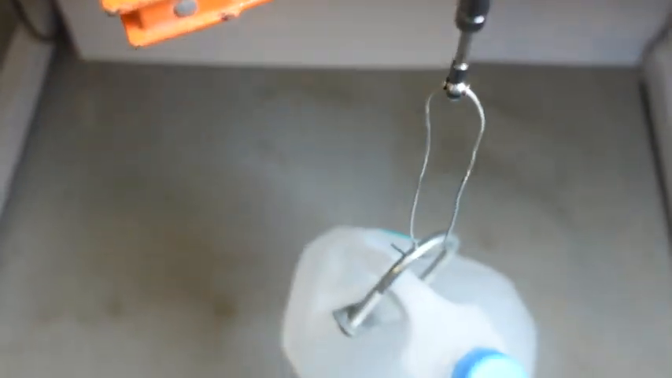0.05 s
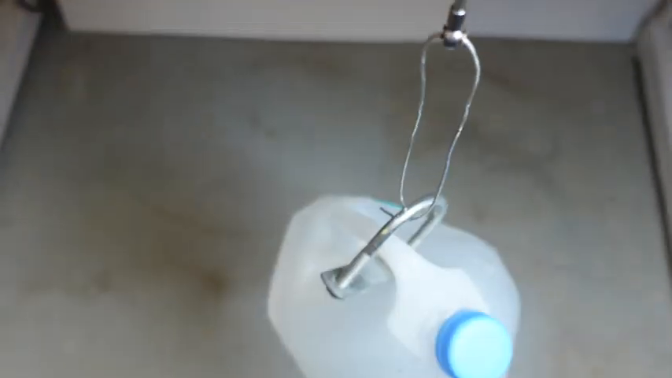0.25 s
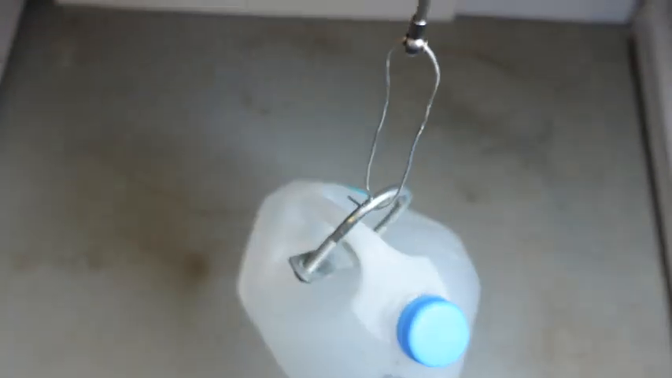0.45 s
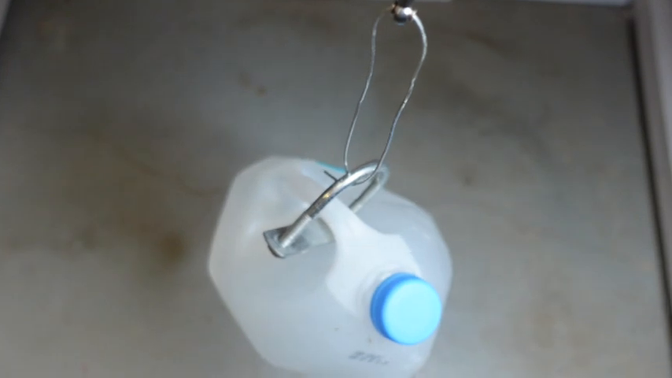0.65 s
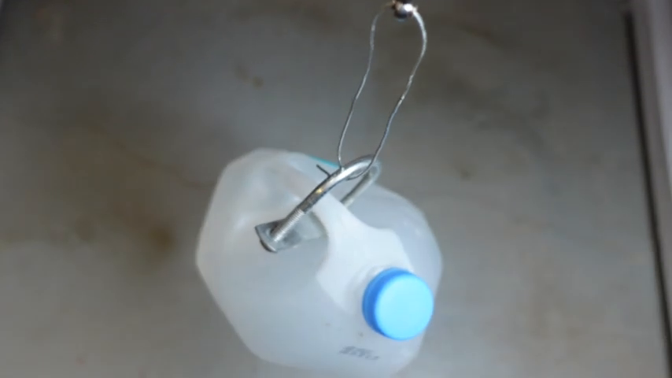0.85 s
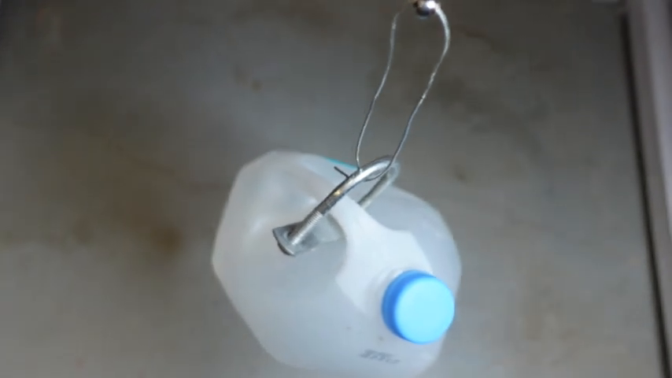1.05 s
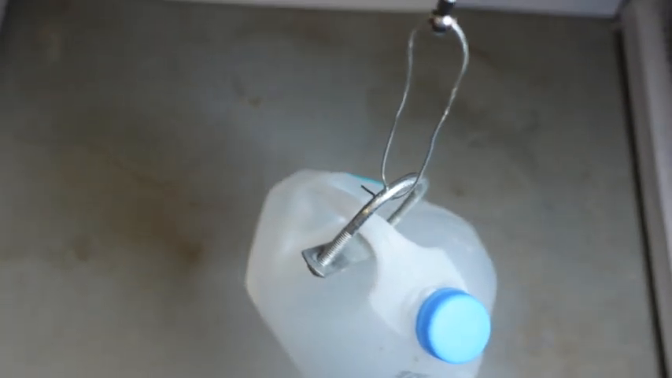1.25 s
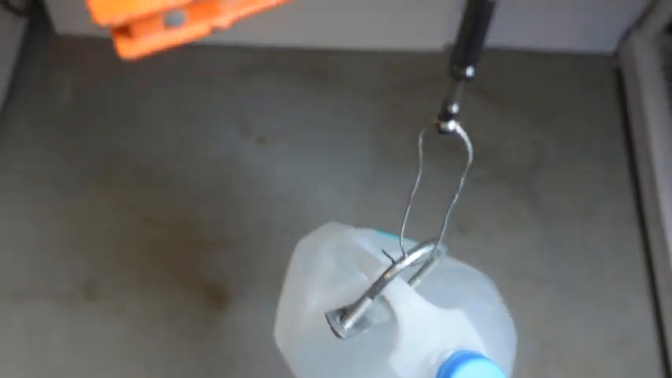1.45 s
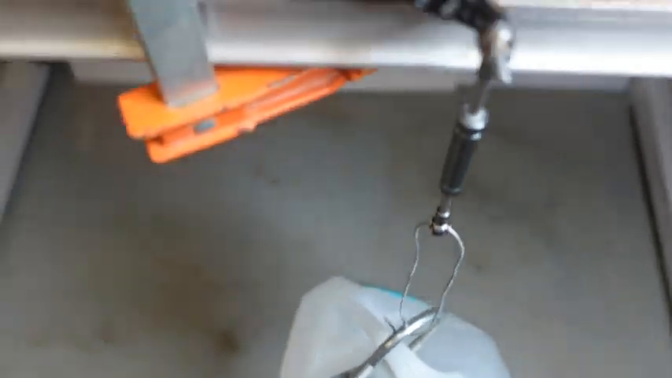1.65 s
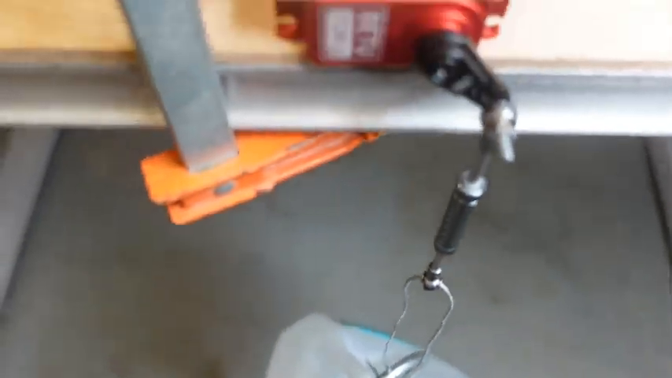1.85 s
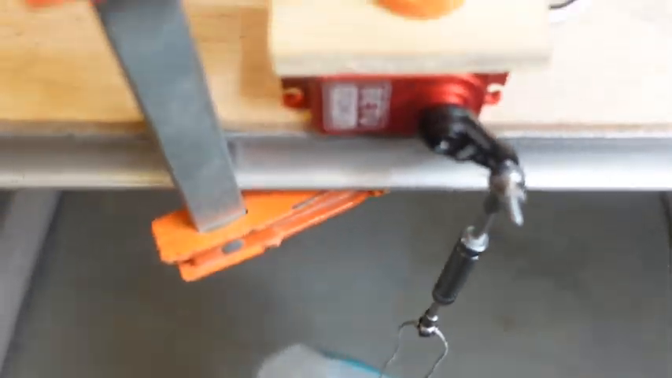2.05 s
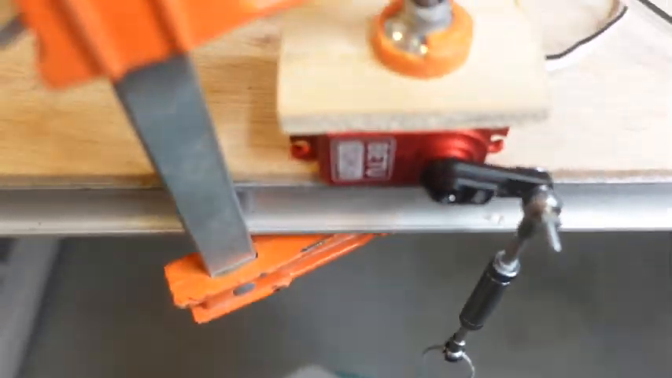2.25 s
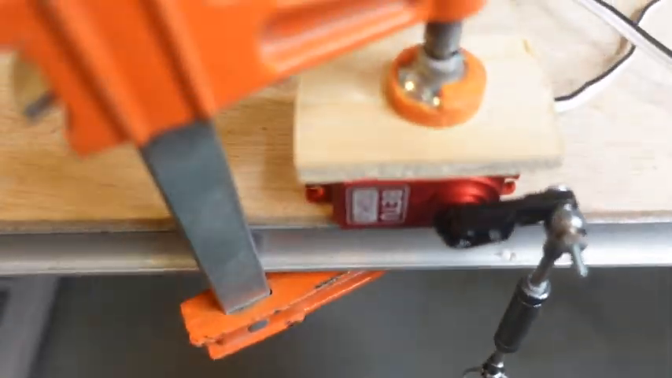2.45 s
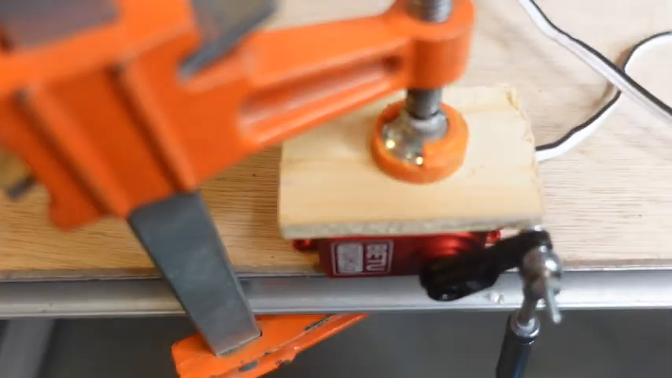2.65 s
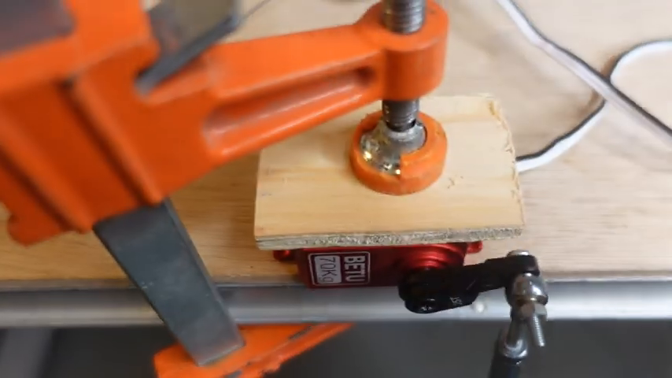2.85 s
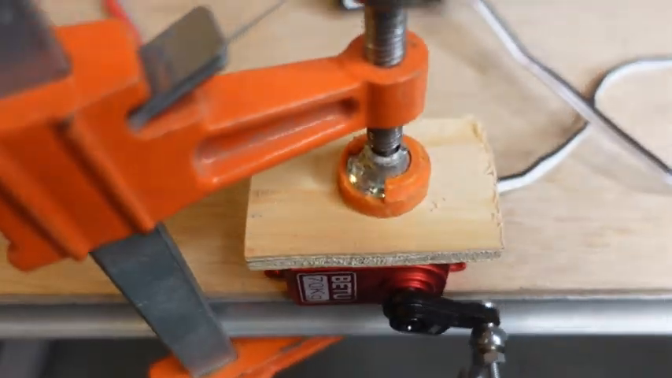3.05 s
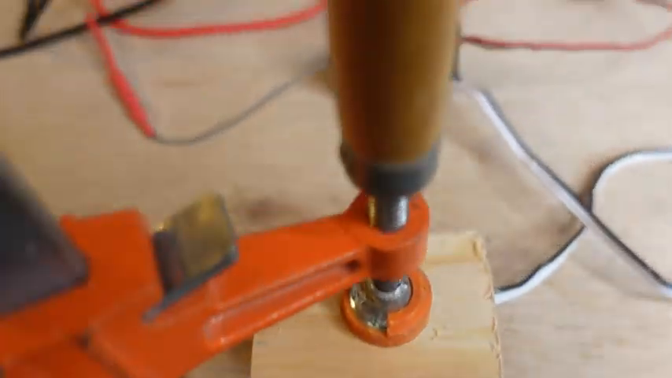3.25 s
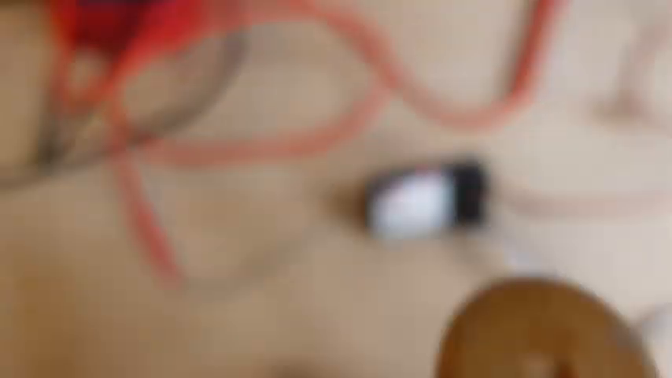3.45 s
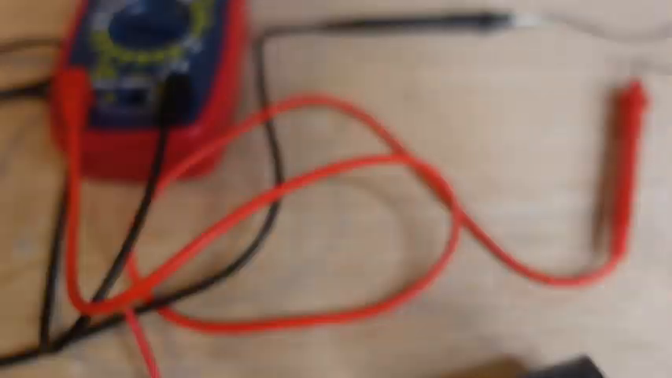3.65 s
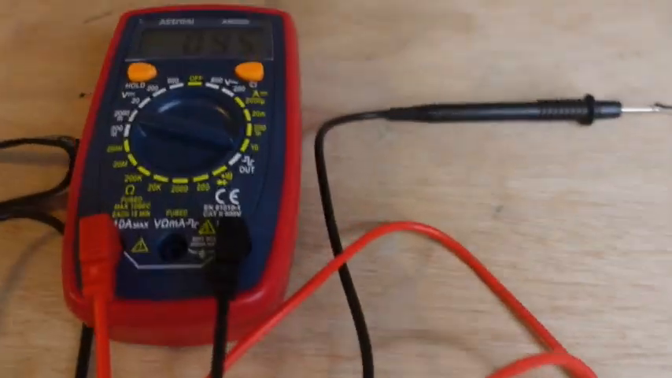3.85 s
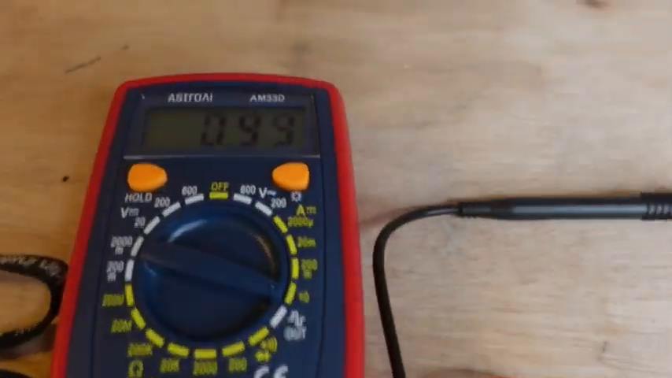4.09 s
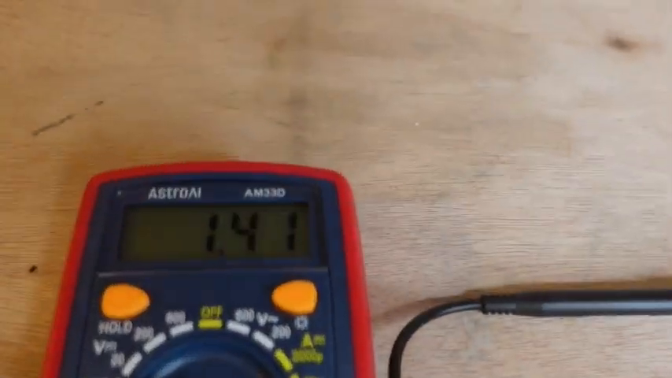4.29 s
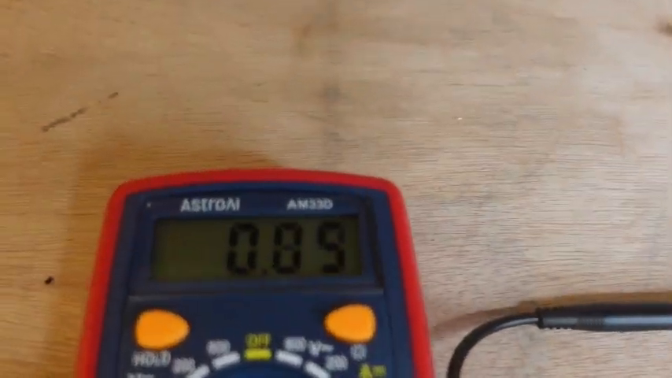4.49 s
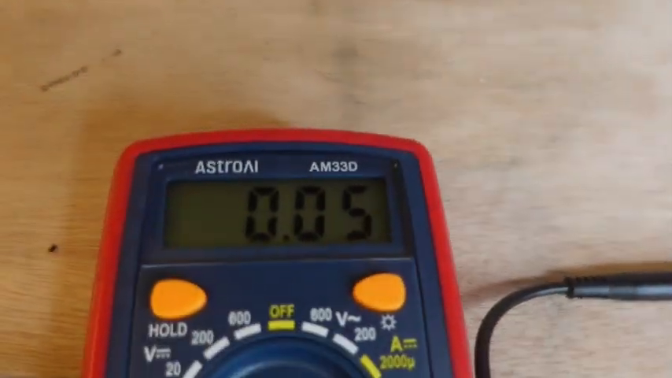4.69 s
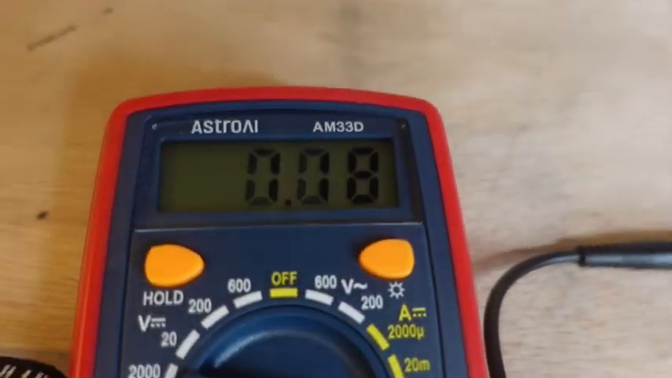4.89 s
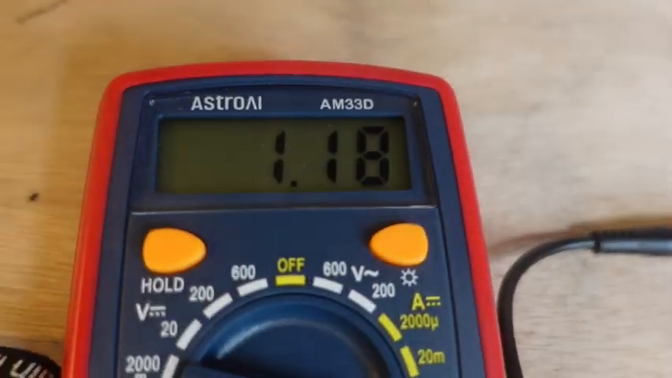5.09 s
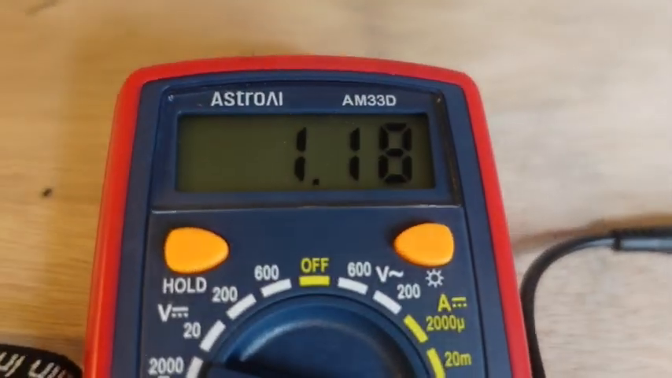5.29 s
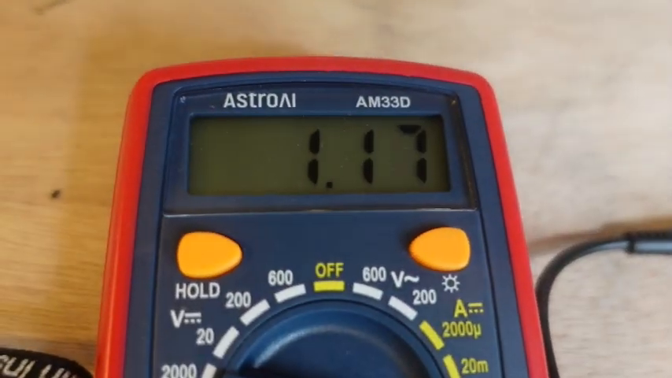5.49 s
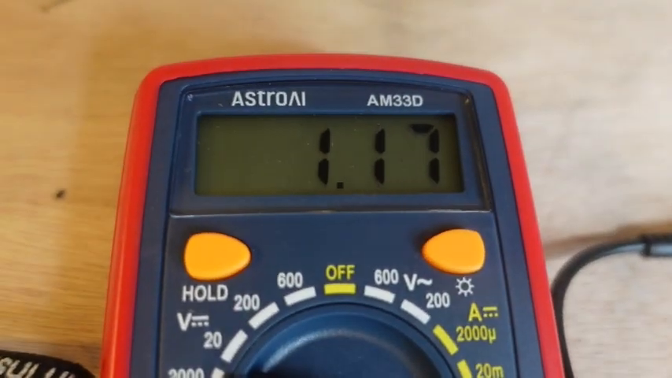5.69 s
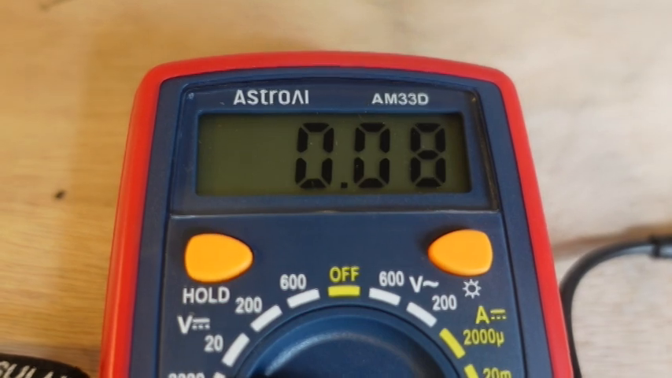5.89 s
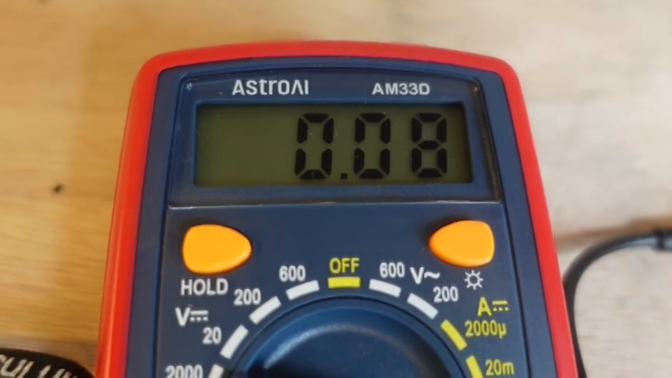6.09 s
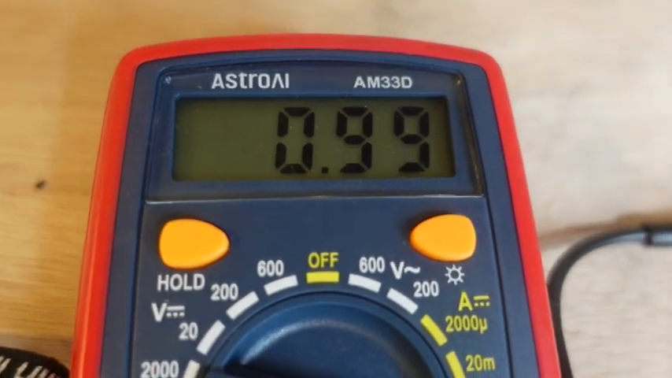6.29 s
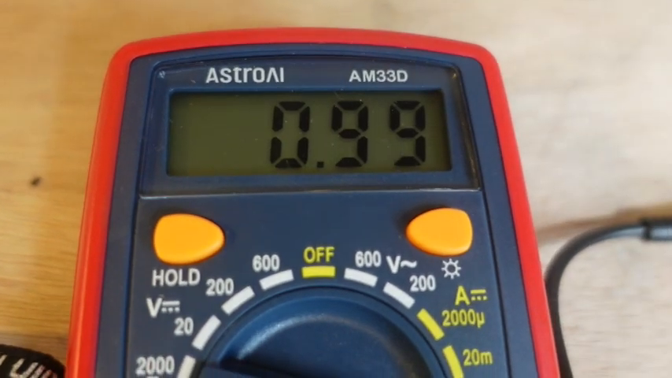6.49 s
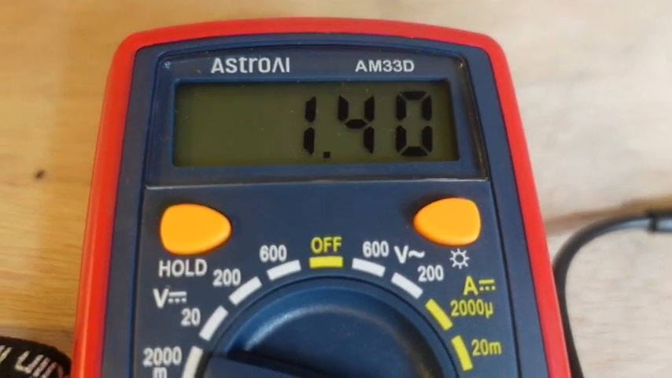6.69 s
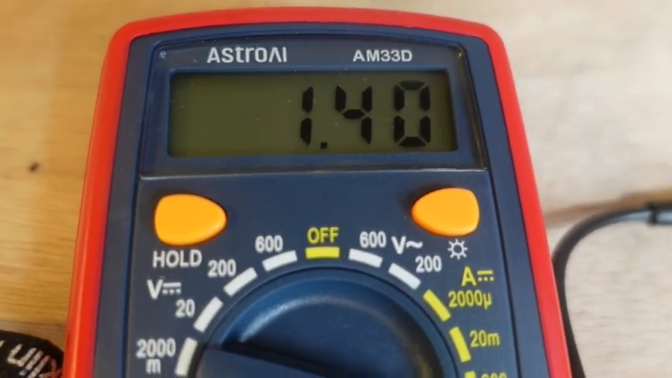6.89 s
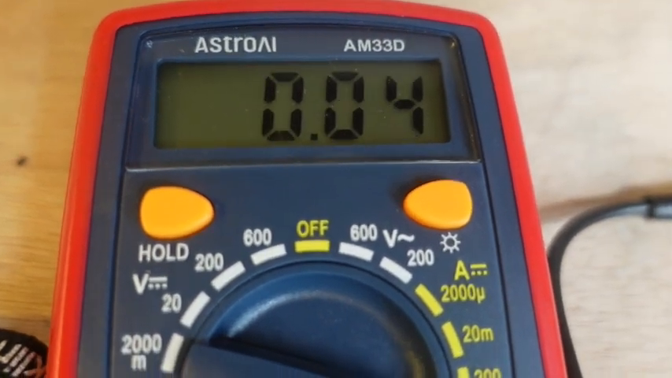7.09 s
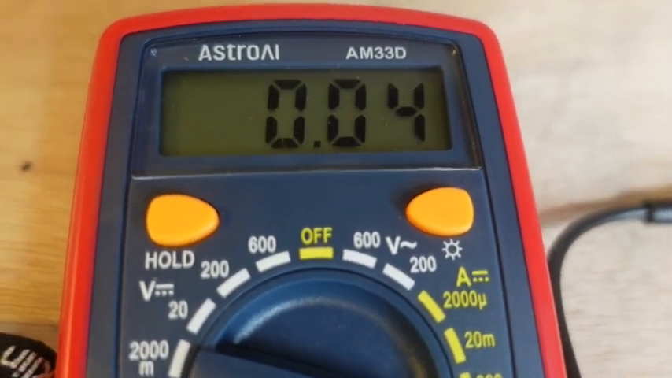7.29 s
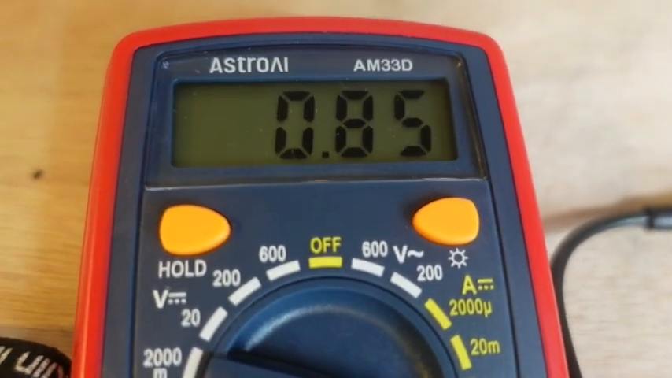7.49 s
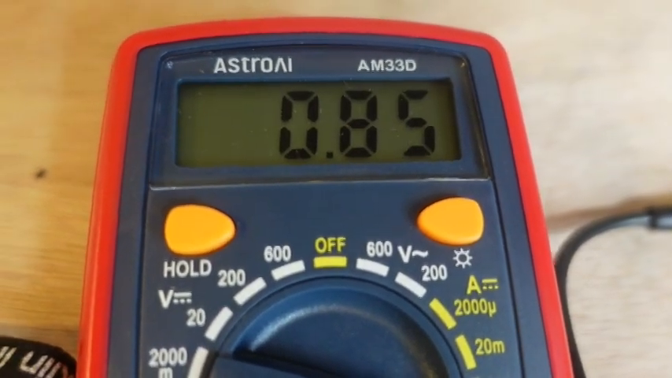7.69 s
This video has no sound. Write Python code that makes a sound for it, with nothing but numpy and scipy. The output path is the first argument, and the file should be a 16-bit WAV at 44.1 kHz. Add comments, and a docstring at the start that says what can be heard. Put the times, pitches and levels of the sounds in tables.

```python
"""In a quiet workshop, a small servo motor clamped to a bench lifts and lowers a hanging water jug.
It makes twelve quick sweeps: slow and labouring on the way up, fast and surging on the way down.
Its smallest gear whines and its metal teeth rattle, shaking the case and the bench top, while the
motor's drive adds a thin whistle. The microphone starts in front of the servo and moves off over
the bench, with a soft rustle and a few bumps from the hand."""
import sys
import numpy as np
from scipy import signal
from scipy.fft import rfft, irfft
from scipy.io import wavfile
from scipy.ndimage import uniform_filter1d, map_coordinates

SR = 44100
rng = np.random.default_rng(int(sys.argv[2]) if len(sys.argv) > 2 else 0)


def pcm_store(signal):
    """Save signal as 16-bit PCM."""
    levels = np.round(np.clip(np.atleast_2d(signal), -1, 1) * 32767)
    wavfile.write(sys.argv[1], SR, levels.astype(np.int16).T)


N = 341368
TIME = np.arange(N) / SR

# Levels in the tables are relative: the functions set how loud each sound ends up.
# The tone of the workshop's background hush. Each row: frequency in Hz, level in dB.
AIR_TONE = [(15, -76), (25, -24), (71, -4.5), (172, -2.5), (363, -6.5), (790, -8), (3090, -18), (4870, -30),
            (5720, -20), (13100, -32.5), (15000, -12)]
# Sweeps that lift the jug, then those that lower it. Only the tail of the first lift is heard.
# Each row: start in seconds, length in seconds, speed in teeth per second, then five levels in dB:
# effort (how hard the gears push), whine, treble, bench and whistle.
LIFT_SWEEPS = [ (-.6, 0.57, 1610, -21, 2, -0.5, 10, 3), (.812, 0.5, 1623, -14, 0.5, -1.5, -6.5, -1),
               (2.009, 0.55, 1621, -15.5, 3, -1.5, -7.5, -6.5), (3.432, 0.53, 1614, -19, 1, -0.5, 2.5, -12),
               (4.657, .518, 1629, -21, 1.5, 2, 6, -14), (5.982, 0.54, 1601, -21.5, 1, 2.5, 7, -11.5),
               (7.264, 0.54, 1612, -21.5, 2, 3, 7, -13)]
LOWER_SWEEPS = [ (.15, 0.32, 2191, -16.5, 6, 4.5, 0.5, 3.5), (1.351, .33, 1893, -12.5, -3, -1.5, -1, -1.5),
                (2.782, .37, 2127, -14, 0.5, 0.5, -2.5, 0), (4.117, 0.32, 2196, -22.5, 3, 5, 13.5, -4),
                (5.32, .41, 1649, -19.5, -5, -0.5, 9.5, 1), (6.66, 0.32, 2259, -20, 1, 3.5, 12, -5)]
# The swinging jug lets the motor run ahead until its controller reins it in.
# Each row: peak time in seconds, extra speed in teeth per second, build-up in seconds.
JUG_SURGES = [ (0.249, 1337, 0.035), (.385, 699.6, 0.056), (0.919, 210.3, 0.031), (1.425, 804.6, 0.041),
              (1.555, 539.3, 0.058), (2.188, 89.7, .03), (2.897, 1085, 0.038), (3.125, 446.3, 0.039),
              (3.621, 69.92, 0.041), (4.22, 1207, .05), (4.389, 829, .035), (4.78, 140.4, .03),
              (5.41, 764.4, .04), (5.63, 855.6, 0.037), (5.71, 550, .02), (6.095, 189.8, .03),
              (6.755, 1147, .045), (6.89, 599.2, 0.048)]
# The tones in the whine. Each row: multiple of the tooth rate, level in dB, dB added as speed doubles.
WHINE_TONES = [(1, -9, 0), (2, -18, 12), (3, -12, -2)]
# The tone of the case, heard from the front and from aside. Each row: frequency in Hz, level in dB.
CASE_FRONT_TONE = [(700, -84.5), (1200, -38.5), (1700, -28.5), (2300, -19.5), (3050, -17), (3560, -5),
                   (4790, -2.5), (5550, -8.5), (8130, -12), (8940, -15.5), (10400, -13), (11300, -21.5),
                   (14100, -25.5), (15200, -55)]
CASE_ASIDE_TONE = [(700, -46.5), (1200, -69.5), (1700, -16), (2700, -21), (3140, -9), (3450, 1), (4090, -4),
                   (4790, 3.5), (5320, -0.5), (7160, -16), (9320, -10.5), (11000, -17), (14400, -21),
                   (15200, -28)]
# The overall tone of the bench top. Each row: frequency in Hz, level in dB.
BENCH_TONE = [(40, -26), (100, -8.5), (200, 1), (450, -6.5), (700, -10), (1150, -6), (1700, -1.5),
              (2600, -0.5), (4000, -38)]
# Pitches at which the case and the bench ring. Each row: frequency in Hz, width in Hz, boost in dB.
CASE_RINGS = [(1605, 120, 10), (2360, 89, 2), (2840, 12, 11.5), (3587, 68, 11.5), (3877, 133, 10.5),
              (4240, 97, 8), (4573, 38, -7), (4730, 46, 9), (4990, 233, 6.5), (5430, 24, 7.5),
              (6260, 39, 5.5), (6172, 47, 5), (6623, 130, 9.5), (7320, 440, 7), (7930, 75, 12.5),
              (8900, 67, 8), (12600, 330, 3.5)]
BENCH_RINGS = [(138, 9.6, 13), (224, 22, 6), (412.3, 28, 10.5), (552, 72, 7.5), (793, 26, 13),
               (923.3, 70, 17)]
# The tone of the echoes from the sides. Each row: frequency in Hz, level in dB.
SIDE_TONE = [(150, 1), (700, 5.5), (2000, 2.0), (5000, 3.0), (12000, -1)]
# The gears tick as they take up their slack. Each row: start in seconds, level in dB.
SLACK_TICKS = [(.109, -14), (.786, -34), (.807, -48), (1.944, -27), (2.755, -18), (4.122, -22),
               (4.627, -30), (7.233, -32), (7.275, -37)]
# The teeth lock in and squeal. Each row: peak time in seconds, half length in seconds, level in dB.
GEAR_SQUEALS = [(0.224, 0.0093, -15), (2.889, 0.02, -3.5), (4.216, .011, -1), (4.385, 0.027, -10),
                (6.766, 0.015, -2.5)]
# The hand bumps the microphone. Each row: start in seconds, level in dB.
HAND_BUMPS = [(2.369, -53), (4.079, -35.5), (5.199, -26), (6.462, -21), (6.529, -30), (6.649, -31.5),
              (7.53, -26), (7.569, -32), (7.639, -27.5)]
# The dull tone of a bump. Each row: frequency in Hz, level in dB.
BUMP_TONE = [(40, -12), (90, -1), (150, 12.5), (220, 8.5), (320, -3.5), (900, -13), (3000, -83)]
# The rise and fall of the carried microphone's rustle. Each row: time in seconds, level in dB.
RUSTLE_LEVELS = [(3.335, -83), (3.345, -47.5), (3.42, -44.5), (3.55, -65)]
# The tone of that rustle. Each row: frequency in Hz, level in dB.
RUSTLE_TONE = [(200, -29), (1000, -14.5), (1600, 0.5), (2800, -0.5), (6000, -1.5), (14000, -14.5)]

TEETH = 10  # on the pinion, the small gear on the motor's shaft


def undb(db):
    """Turn decibels into a number to multiply by."""
    return 10 ** (np.asarray(db) / 20)


def unit(x):
    """Scale a signal so that its average strength (rms) is 1."""
    return x / np.sqrt(np.mean(x ** 2))


def wobble(rate):
    """A random wobble of strength 1 that changes course about rate times a second."""
    knots = rng.standard_normal(N // 8)
    return unit(np.interp(TIME * rate, np.arange(len(knots)), knots))


def body(tone, rings=(), size=4096):
    """How an object answers one sharp tap, given its overall tone and the pitches it rings at."""
    f = np.maximum(np.arange(size // 2 + 1) * SR / size, 1)
    hz, db = np.transpose(tone)
    db = np.interp(np.log(f), np.log(hz), db)
    for centre, width, peak_db in rings:
        db = db + peak_db / (1 + (2 * (f - centre) / width) ** 2)
    # make all the ringing come after the tap, never before it
    cepstrum = irfft(np.log(undb(db)))
    cepstrum[1:size // 2] *= 2
    cepstrum[size // 2 + 1:] = 0
    response = irfft(np.exp(rfft(cepstrum)))
    return response / np.linalg.norm(response)


def ring(x, response):
    """Treat every sample of x as a tap that sets off the response."""
    return signal.fftconvolve(x, response)[:N]


def clicks(times, sizes):
    """One sharp click at each time."""
    return np.bincount(np.clip(times * SR, 0, N - 1).astype(int), sizes, N)


def bursts(events, decay_s):
    """A short burst of noise that dies away, for each row of start time and level."""
    times, db = np.transpose(events)
    fade = np.exp(-TIME[:SR // 2] / decay_s)
    return ring(clicks(times, undb(db)), fade) * rng.standard_normal(N)


def workshop_air(level_db=-53):
    """The room's faint hush, gently rising and falling."""
    return undb(level_db + wobble(1.7)) * ring(rng.standard_normal(N), body(AIR_TONE))


def latest_sweep():
    """For every sample: whether the latest sweep is a lift, and the values in its row."""
    rows = [(*row, True) for row in LIFT_SWEEPS] + [(*row, False) for row in LOWER_SWEEPS]
    rows = np.array(sorted(rows))
    latest = np.maximum(np.searchsorted(rows[:, 0], TIME) - 1, 0)
    *columns, lifting = rows[latest].T
    return lifting > 0, columns


def jug_load(lifting, age, arm_level_s=.36, width_s=.07):
    """The jug's extra pull during a lift, from 0 to 1, greatest when the arm is level."""
    return lifting * np.exp(-.5 * ((age - arm_level_s) / width_s) ** 2)


def motor_speed(lifting, age, length, run_hz, crawl_hz=399.5, brake_early_s=.05, brake_s=.16):
    """Teeth meeting per second: the motor speeds up, sags under load, surges and brakes to a crawl."""
    hz = run_hz * (1 - .1 * jug_load(lifting, age))
    for at, extra_hz, build_s in JUG_SURGES:
        width_s = np.where(TIME < at, build_s, .55 * build_s)  # a surge dies faster than it builds
        hz = hz + extra_hz * np.exp(-.5 * ((TIME - at) / width_s) ** 2)
    spin_up = 1 - np.exp(-age / np.where(lifting, .028, .019))
    brake = np.exp(-(np.maximum(age - length + brake_early_s, 0) / brake_s) ** 2)
    hz = uniform_filter1d(crawl_hz + (hz - crawl_hz) * spin_up * brake, size=200)
    return hz * (1 + .019 * wobble(55))  # the controller hunts for the right speed


def motor_effort(lifting, age, length, effort_db, shudder_db=1.17):
    """How hard the gears are pushed: the push builds, holds, then fades to a faint holding buzz."""
    attack_db = -32.5 * np.exp(-age / np.where(lifting, .03, .012))
    release_db = -np.maximum(age - length, 0) * np.where(lifting, 189.5, 296)
    # the drive cuts out just before it turns round to lower
    cut_db = sum(np.interp(TIME, [start - .03, start], [0, -79], right=0) for start, *_ in LOWER_SWEEPS)
    rest_db = np.where(lifting, -29, -46)
    shape_db = attack_db - jug_load(lifting, age) + np.maximum(release_db + cut_db, rest_db)
    # the controller corrects the drive about fifty times a second, so the push shudders
    shudder = np.sin(2 * np.pi * 52 * TIME + wobble(10)) + .5 * wobble(90)
    return undb(effort_db + shape_db + shudder_db * shudder)


def tooth_rattle(tooth_hz, teeth_passed, scatter_db=3.5, slide_db=-4):
    """Every tooth knocks with its own strength and then slides with a hiss."""
    timing, direction, strength = rng.standard_normal((N // 10, 3))[:int(teeth_passed[-1])].T
    times = np.interp(np.arange(len(timing)) + .3 * timing, teeth_passed, TIME)
    knocks = clicks(times, np.sign(direction) * undb(scatter_db * strength))
    force = unit(knocks / np.sqrt(tooth_hz)) + undb(slide_db) * rng.standard_normal(N)
    # the load swells once per turn of the shaft, and at each tooth of the next gear
    shaft_db = 3 * np.sin(2 * np.pi * teeth_passed / TEETH)
    next_gear_db = 1.5 * np.sin(2 * np.pi * teeth_passed * .243)
    return unit(force * undb(shaft_db + next_gear_db))


def tooth_phase(teeth_passed):
    """One cycle per tooth, early and then late in each turn because the pinion is off centre."""
    return 2 * np.pi * (teeth_passed + .045 * np.sin(2 * np.pi * teeth_passed / TEETH))


def pinion_whine(tooth_hz, teeth_passed, cruise_hz=1600):
    """Teeth meeting in a steady stream sing: clean at cruising speed, rasping when fast and bouncing."""
    bouncing = np.interp(tooth_hz, [1650, 2200], [.03, .105])
    phase = tooth_phase(teeth_passed) + 2 * np.pi * bouncing * wobble(750)
    doublings = np.log2(tooth_hz / cruise_hz)
    tone = 0
    for multiple, db, speed_db in WHINE_TONES:
        level = undb(db + speed_db * doublings + 2.2 * wobble(260))
        tone = tone + level * np.sin(multiple * phase)
    # the whine vanishes at a crawl, and weakens when the motor starts or brakes hard
    running = np.interp(tooth_hz, [1230, 1530], [0, 1])
    doublings_per_s = np.gradient(uniform_filter1d(doublings, size=800)) * SR
    steady = np.interp(doublings_per_s, [-10, -3, 6, 20], [.2, 1, 1, .2])
    return np.sqrt(2) * tone * running * steady


def shaft_hum(tooth_hz, teeth_passed, hum_db=-22, growl_db=-17, drone_db=-19):
    """The unbalanced motor hums; slower gears drone at cruising speed and growl at high speed."""
    angle = 2 * np.pi * teeth_passed / TEETH
    hum = undb(hum_db + 3 * wobble(30)) * np.sin(angle)
    growl = undb(growl_db) * wobble(130) * np.sin(1.7 * angle)
    drone = undb(drone_db) * wobble(110) * np.sin(5.9 * angle)
    fast = np.interp(tooth_hz, [1600, 2100], [0, 1])
    return hum + fast * growl + (1 - fast) * drone


def drive_whistle(tooth_hz, idle_hz=15620, sag=.17, wander_hz=35):
    """The motor's drive gives a thin whistle that drops in pitch as the motor speeds up."""
    hz = idle_hz - sag * tooth_hz + wander_hz * wobble(330)
    return unit(np.sin(2 * np.pi * np.cumsum(hz) / SR) * undb(3 * wobble(80)))


def servo_case(force, treble_db, treble_hz=6200, leave_s=2.6, arrive_s=3.95):
    """The gears make the case ring; its tone changes as the microphone moves aside."""
    # harder contact between the teeth adds treble, in uneven spurts
    treble = signal.sosfiltfilt(signal.butter(4, treble_hz, "high", fs=SR, output="sos"), force)
    sharp = force + (undb(treble_db + 2 * wobble(140)) - 1) * treble
    front = ring(sharp, body(CASE_FRONT_TONE, CASE_RINGS))
    aside = ring(sharp, body(CASE_ASIDE_TONE, CASE_RINGS))
    moved = np.interp(TIME, [leave_s, arrive_s], [0, 1])
    return (1 - moved) * front + moved * aside


def servo(case_db=-4, bench_db=-31, whistle_db=-32):
    """The whole servo: its gears shake the case and, through the clamp, the bench."""
    lifting, (start, length, run_hz, effort_db, *levels) = latest_sweep()
    age = TIME - start
    whine_db, treble_db, clamp_db, drive_db = (uniform_filter1d(db, size=1000) for db in levels)
    tooth_hz = motor_speed(lifting, age, length, run_hz)
    teeth_passed = np.cumsum(tooth_hz) / SR
    effort = motor_effort(lifting, age, length, effort_db)
    rattle = tooth_rattle(tooth_hz, teeth_passed)
    tones = pinion_whine(tooth_hz, teeth_passed) + gear_squeals(teeth_passed)
    force = effort * (rattle + undb(whine_db) * tones) + slack_ticks()
    case = servo_case(force, treble_db)
    clamp_force = (force + effort * shaft_hum(tooth_hz, teeth_passed)) * undb(clamp_db)
    bench = ring(clamp_force, body(BENCH_TONE, BENCH_RINGS))
    whistle = drive_whistle(tooth_hz) * np.sqrt(effort) * undb(drive_db)
    return undb(case_db) * case + undb(bench_db) * bench + undb(whistle_db) * whistle


def bench_echo(x, delay_s=.0016, sway_s=.00014, gain_db=-11):
    """Sound bounces off the bench top; the delay shifts as the hand sways."""
    return undb(gain_db) * map_coordinates(x, [(TIME - delay_s - sway_s * wobble(2)) * SR], order=3)


def room_echoes(x, fade_s):
    """A wash of echoes starts after a short gap and falls by 60 dB in fade_s seconds."""
    t = TIME[:SR // 2]
    echoes = rng.standard_normal(len(t)) * np.exp(-np.log(1000) * t / fade_s) * (t > .002)
    return ring(x, echoes / np.linalg.norm(echoes))


def slack_ticks(gain_db=-7):
    """The gears tick as they take up their slack."""
    return undb(gain_db) * bursts(SLACK_TICKS, decay_s=.0018)


def gear_squeals(teeth_passed):
    """The teeth lock in for a moment and squeal, loudest at twice the tooth rate."""
    phase = tooth_phase(teeth_passed)
    lock = sum(undb(db) * np.exp(-.5 * ((TIME - at) / half_s) ** 2) for at, half_s, db in GEAR_SQUEALS)
    squeal = undb(-6) * np.sin(phase) + np.sin(2 * phase) + undb(-10) * np.sin(3 * phase)
    return np.sqrt(2) * lock * undb(4 * wobble(400)) * squeal


def hand_bumps(gain_db=-11):
    """The hand knocks the microphone with soft, low thuds."""
    return undb(gain_db) * ring(bursts(HAND_BUMPS, decay_s=.04), body(BUMP_TONE))


def carry_rustle():
    """A short, soft rustle as the microphone is carried over the bench."""
    level_db = np.interp(TIME, *np.transpose(RUSTLE_LEVELS))
    return undb(level_db) * ring(rng.standard_normal(N), body(RUSTLE_TONE))


def scene(room_db=-12, side_db=-16, air_side_db=-14):
    """Mix it all in stereo; left and right differ only in the side echoes and a little of the hush."""
    direct = servo()
    handling = hand_bumps() + carry_rustle()
    air, side_air = workshop_air(), workshop_air()
    room = undb(room_db) * room_echoes(direct, fade_s=.34)
    middle = direct + bench_echo(direct) + room + handling + air
    side_echoes = room_echoes(ring(direct, body(SIDE_TONE)), fade_s=.16)
    side = undb(side_db) * side_echoes + undb(air_side_db) * side_air
    return np.array([middle + side, middle - side])


def record(dry, top_hz=15600):
    """Round off the tallest peaks and cut the highest treble."""
    rounded = .98 * np.tanh(1.16 * dry)
    return signal.sosfilt(signal.ellip(10, .2, 80, top_hz, fs=SR, output="sos"), rounded)


dry = scene()
out = record(dry)
pcm_store(out)
```